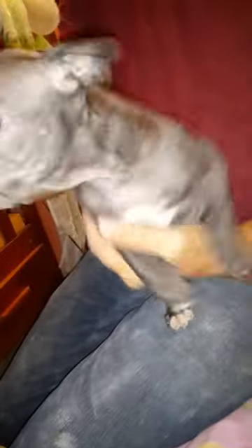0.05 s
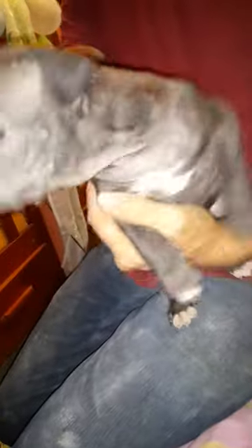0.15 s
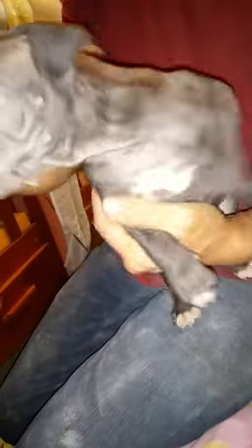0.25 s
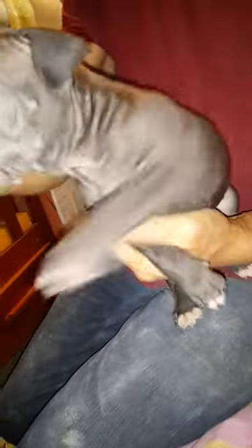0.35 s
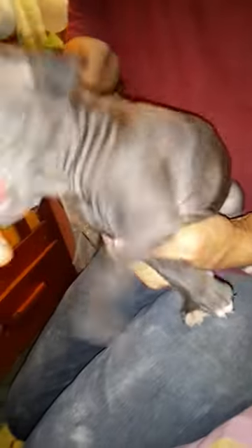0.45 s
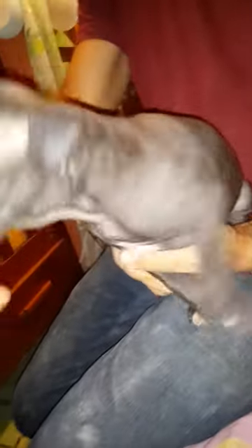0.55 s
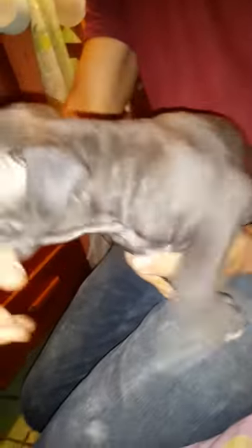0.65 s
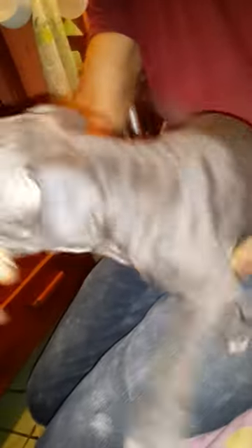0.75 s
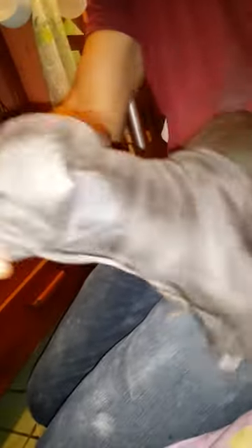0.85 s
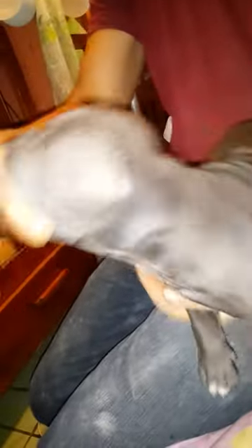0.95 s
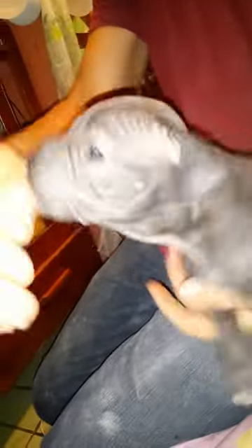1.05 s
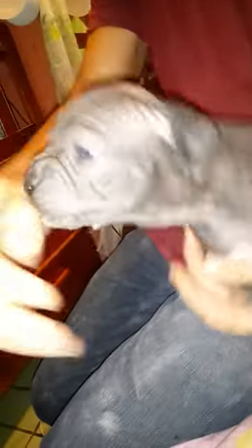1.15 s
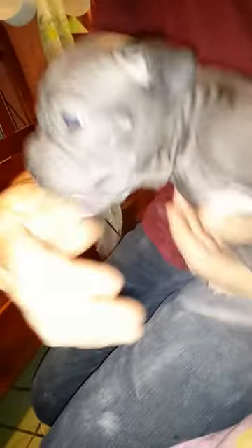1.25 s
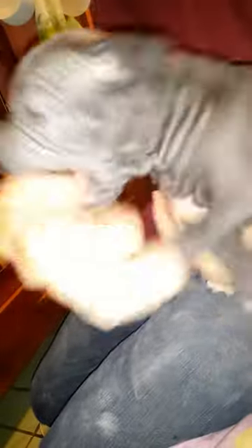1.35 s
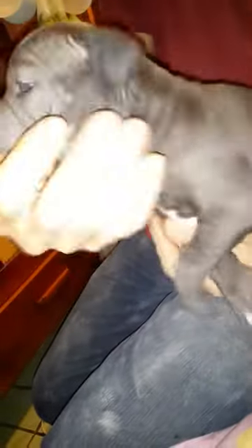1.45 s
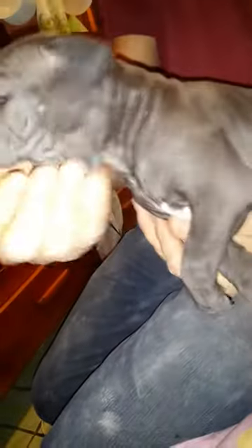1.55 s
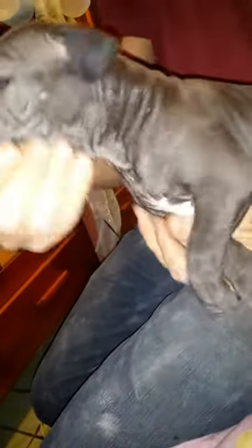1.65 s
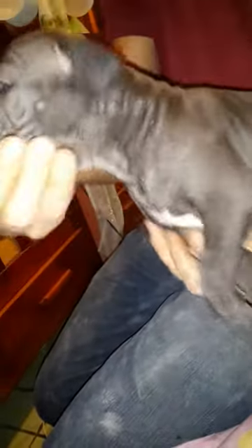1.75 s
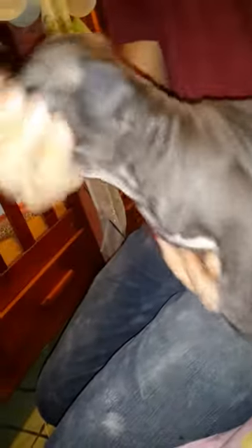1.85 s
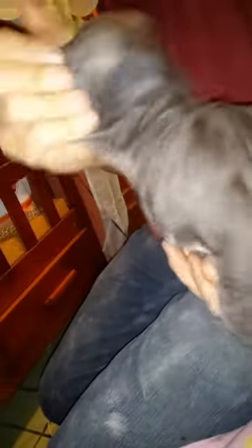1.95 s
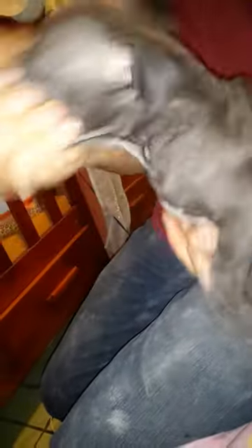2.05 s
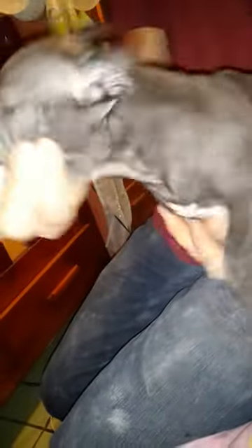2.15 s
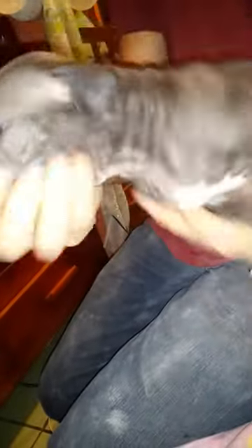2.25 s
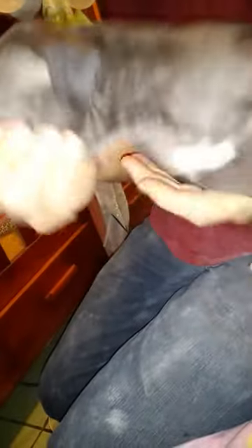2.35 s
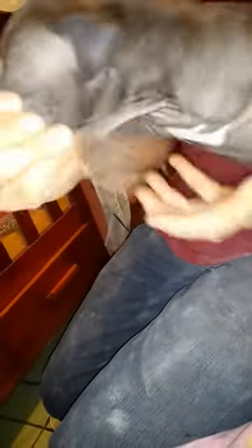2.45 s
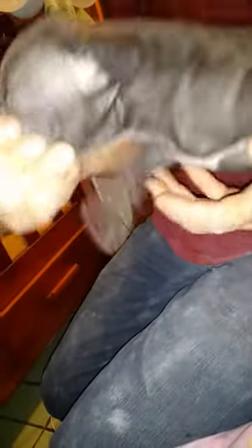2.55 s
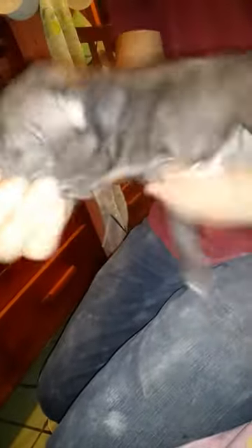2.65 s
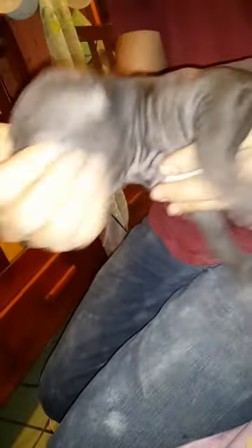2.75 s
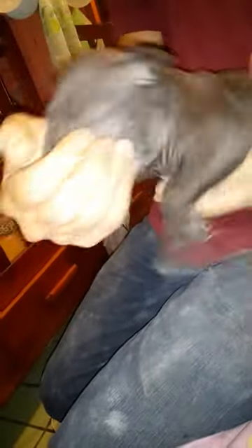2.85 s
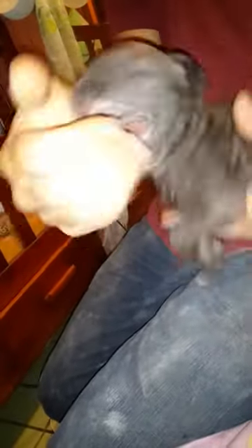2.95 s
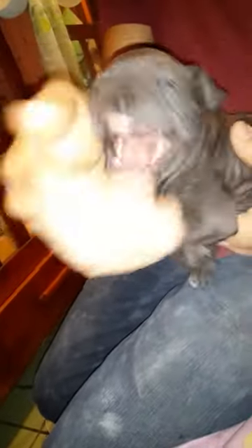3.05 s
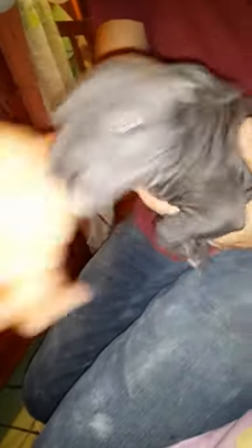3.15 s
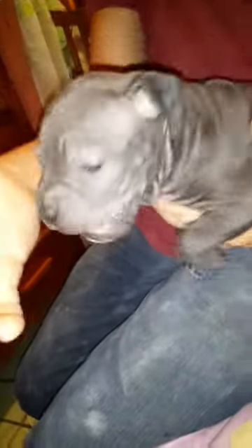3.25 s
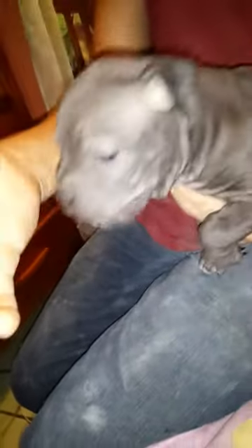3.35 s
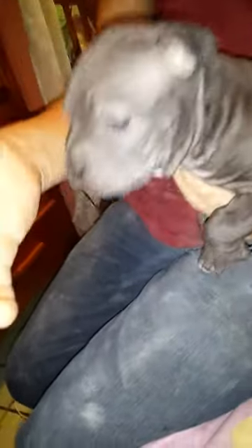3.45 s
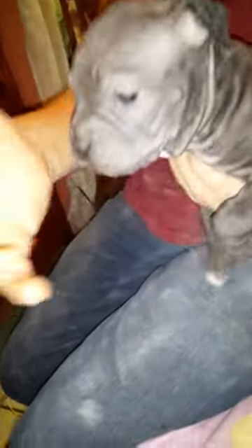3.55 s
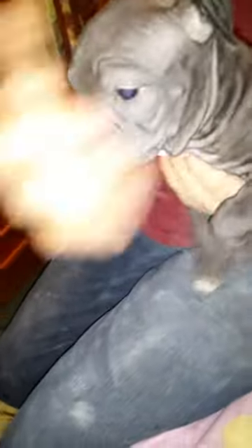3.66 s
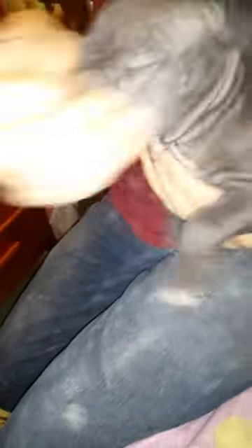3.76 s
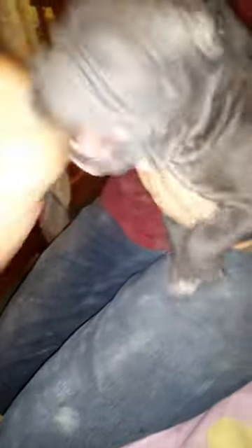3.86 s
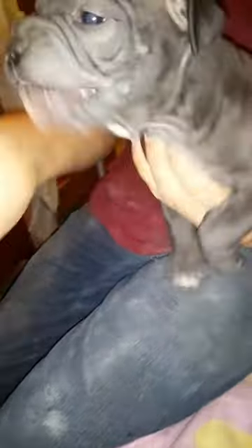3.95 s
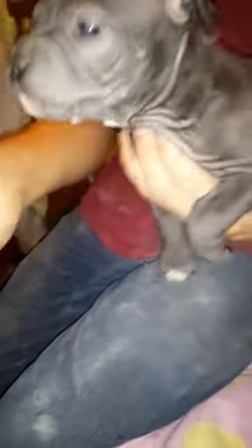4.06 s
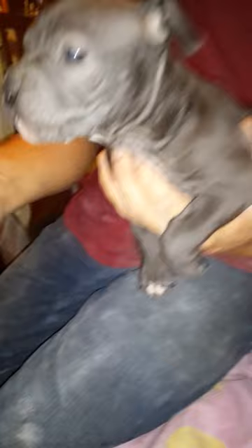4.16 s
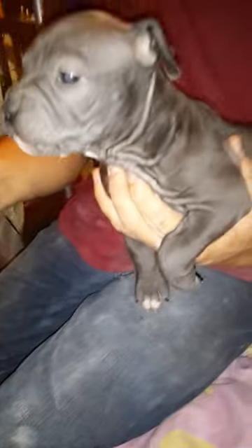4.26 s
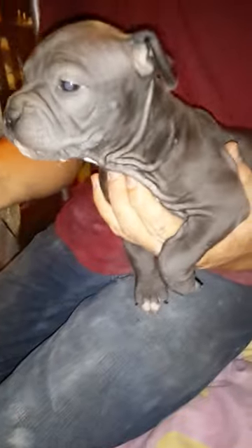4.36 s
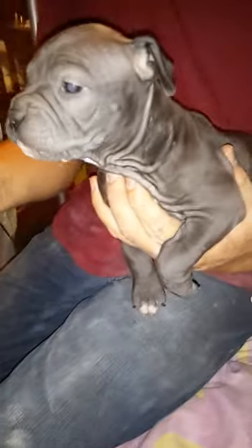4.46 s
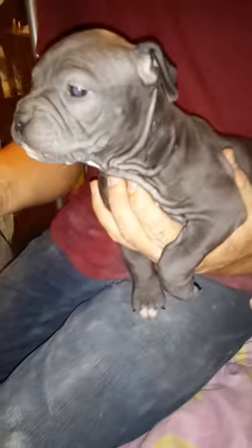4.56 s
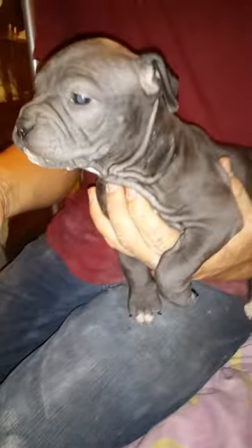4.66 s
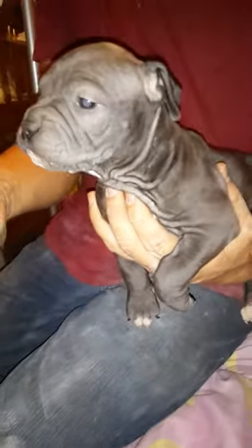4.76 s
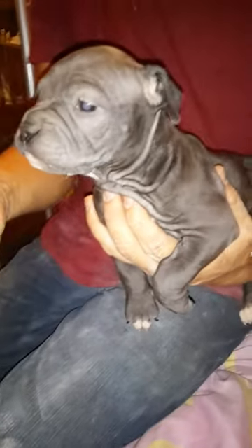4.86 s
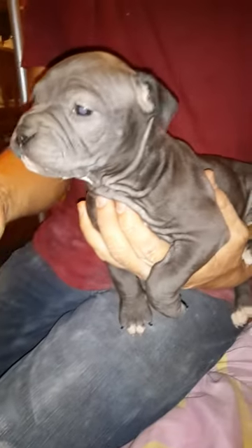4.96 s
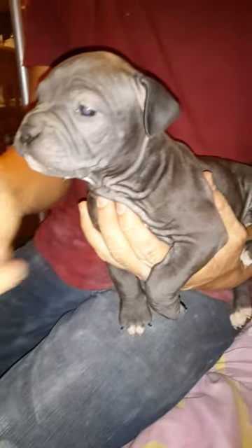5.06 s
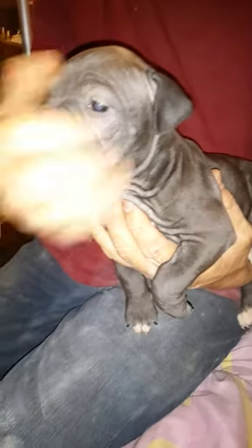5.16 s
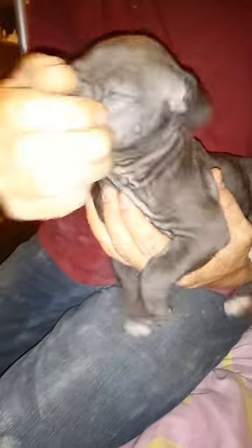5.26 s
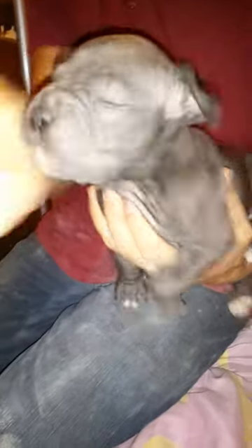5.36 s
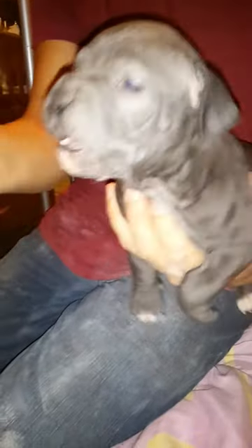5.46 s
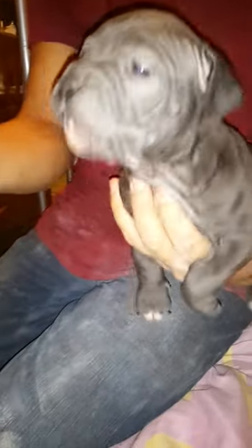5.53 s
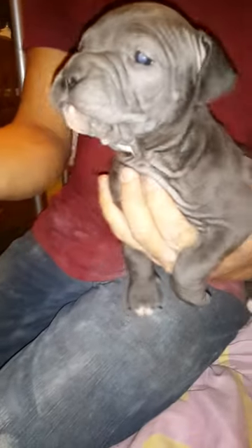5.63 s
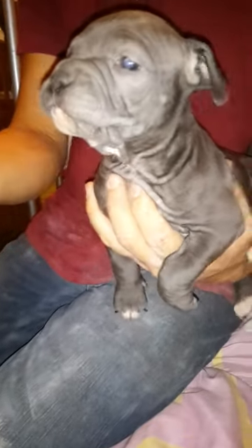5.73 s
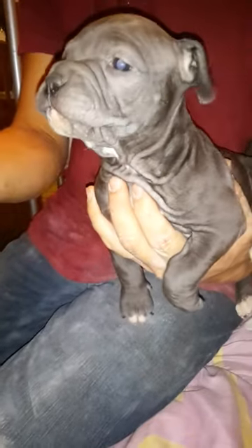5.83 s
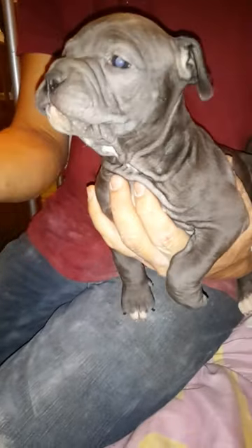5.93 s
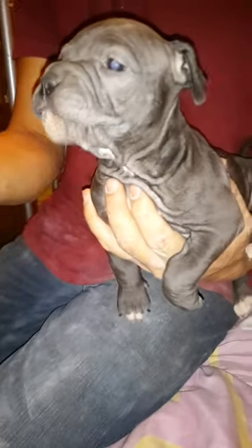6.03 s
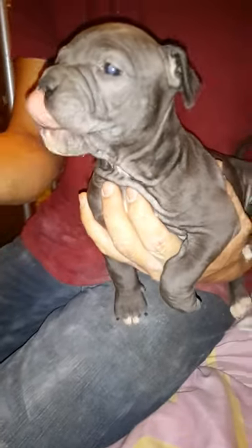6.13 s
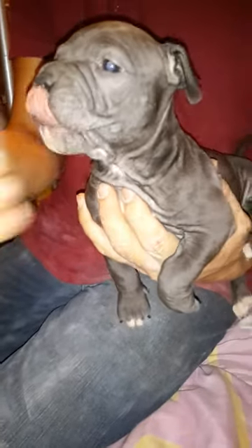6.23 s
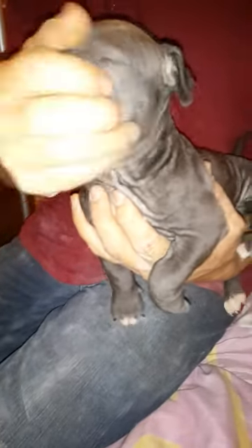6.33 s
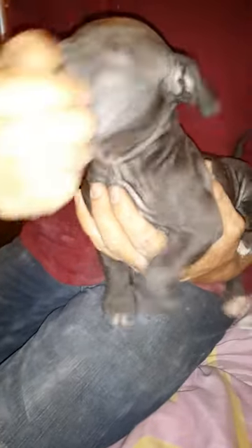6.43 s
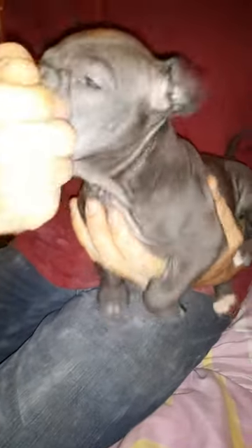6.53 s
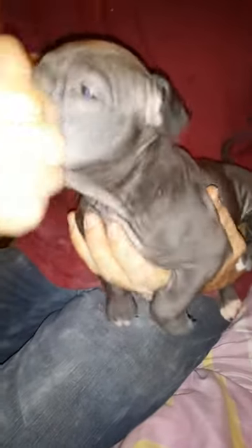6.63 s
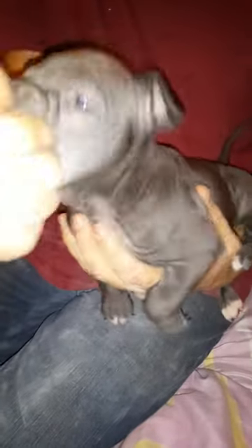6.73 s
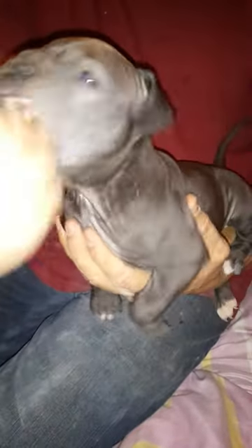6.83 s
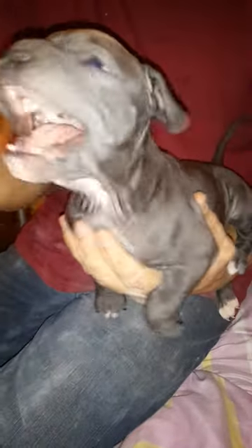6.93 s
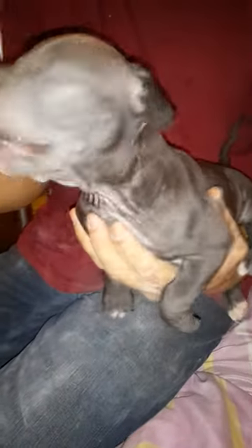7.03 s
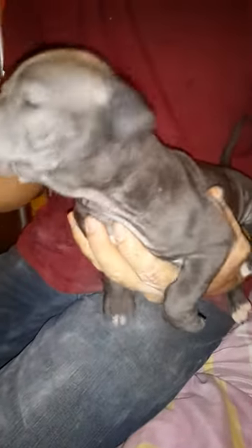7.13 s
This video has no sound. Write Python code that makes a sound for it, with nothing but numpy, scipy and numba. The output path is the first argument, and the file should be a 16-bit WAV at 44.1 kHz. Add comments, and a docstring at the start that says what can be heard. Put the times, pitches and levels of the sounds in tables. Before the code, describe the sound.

A young puppy growls close to the microphone in a small, dry furnished room, over low rumble and light hiss. From 0 to 0.45 s comes a rough, raspy growl, then a tiny grunt with wet clicks, a fur swish and soft bumps around 0.6-0.85. Growling resumes from 0.8 to 1.35, fading lower, and again from 1.7 to 2.3 with crackling throat snaps. The fiercest bout, 2.6-3.2, surges and snarls, followed by fur rubbing and wet mouth clicks. A quieter growl at 3.5-3.8 leads to a higher yap around 4.0-4.1, with a faint thin whine falling until 4.4. Near silence follows until about 5.2, when soft bumps and ticks return. A short, sharp yap lands at 5.6. Small wet clicks, a weak grunt at 6.25, a sniff at 6.35 and fur rubs from 6.5 to 6.85 precede a final rising, then coarse growl at 6.9-7.2.

```python
"""A young puppy on a lap growls in short bouts while a hand plays with its muzzle, in a small furnished room.
Uneven snaps of its vocal folds ring in chest, throat and mouth and chop the airflow into a rasp.
Twice the growl tightens into a yap; a faint pure whine falls after the first.
Around the bouts fur rubs in coloured noise, the wet mouth clicks as struck modes, and the puppy sniffs once.
Two close microphone ports pick it up, over soft bumps, low rumble and hiss."""
import sys
import numpy as np
from scipy import signal
from scipy.fft import rfft, irfft, next_fast_len
from scipy.io import wavfile
from scipy.ndimage import uniform_filter1d, map_coordinates
from numba import njit

SR = 44100
rng = np.random.default_rng(int(sys.argv[2]) if len(sys.argv) > 2 else 0)


def dump_mix(stems):
    """Bounce the given channels to the path in sys.argv[1] as a 16-bit WAV at rate SR."""
    frames = np.atleast_2d(stems).T  # one column per channel
    limited = np.clip(frames, -1, 1)  # hard clip at full scale
    pcm = np.round(limited * 32767).astype(np.int16)
    wavfile.write(sys.argv[1], SR, pcm)


N = 317079
TIME = np.arange(N) / SR


def from_db(db):
    """Decibels to amplitude gain."""
    return 10 ** (np.asarray(db) / 20)


def rms_one(x):
    """Scale to unit power."""
    return x / np.sqrt(np.mean(x ** 2) + 1e-20)


def even(x, span_s=0.028):
    """Hold the short-term power near one, over a span long enough to keep single pulses."""
    size = max(int(span_s * SR), 8)
    power = uniform_filter1d(uniform_filter1d(x * x, size), size // 2)
    return x / np.sqrt(power + 1e-14)


def in_time(rows):
    """Interpolate the columns after the first (seconds) at every sample."""
    s, *columns = np.transpose(rows)
    return [np.interp(TIME, s, column) for column in columns]


def drift(rate_hz):
    """Random curve of spread about one, with `rate_hz` new values a second."""
    values = rng.standard_normal(8000)
    return 1.2 * np.interp(TIME * rate_hz, np.arange(len(values)), values)


def swell(centre_s, half_s):
    """A smooth hump of height one."""
    return np.exp(-.5 * np.minimum(((TIME - centre_s) / half_s) ** 2, 30))


def envelope(start_s, end_s, attack_s, release_db_per_s):
    """Rise from the start, hold until the end, then die away."""
    rise = np.clip((TIME - start_s) / attack_s, 0, 1)
    return rise * from_db(-release_db_per_s * np.clip(TIME - end_s, 0, .5))


def colour(x, points):
    """Shape a signal by a spectrum of (Hz, dB) points."""
    hz, db = np.transpose(points)
    size = next_fast_len(N + 2048)
    grid_hz = np.maximum(np.fft.rfftfreq(size, 1 / SR), 1)
    gain = from_db(np.interp(np.log(grid_hz), np.log(hz), db))
    return irfft(rfft(x, size) * gain, size)[..., :N]


def noise(points):
    """Coloured noise of unit power."""
    return rms_one(colour(rng.standard_normal(N), points))


def cut(x, hz, kind, order=2):
    """Butterworth high- or low-pass."""
    sos = signal.butter(order, min(hz, SR / 2 - 500), kind, fs=SR, output="sos")
    return signal.sosfilt(sos, x + 1e-18)


def delayed(x, seconds):
    """Read a signal late by a changing time."""
    return map_coordinates(x, [np.arange(N) - seconds * SR], order=2, mode="nearest")


@njit
def resonate(x, hz, width_hz):
    """Two-pole resonance with moving centre and width, and gain one on top."""
    y = np.zeros(len(x))
    for i in range(2, len(x)):
        r = np.exp(-np.pi * width_hz[i] / SR)
        driven = (1 - r * r) / 2 * (x[i] - x[i - 2])
        y[i] = driven + 2 * r * np.cos(2 * np.pi * hz[i] / SR) * y[i - 1] - r * r * y[i - 2] + 1e-18
    return y


def cavities(source, modes, patchy_db, wander=0.066):
    """Resonances of alternating sign that each shift and swell as the lips are pushed about."""
    out = 0
    for k, (hz, width_hz, db) in enumerate(modes):
        gain = (-1) ** k * from_db(db + patchy_db * drift(25))
        out = out + gain * resonate(source, hz * np.exp(wander * drift(24)), width_hz * np.ones(N))
    return out


def strike(times_s, sizes, modes):
    """Clicks set damped modes ringing in proportion to each click's height."""
    clicks, out = np.full(N, 1e-18), 0
    clicks[(np.asarray(times_s) * SR).astype(int)] = sizes
    for hz, width_hz, db in modes:
        r, w = np.exp(-np.pi * width_hz / SR), 2 * np.pi * hz / SR
        out = out + from_db(db) * signal.lfilter([0, np.sin(w)], [1, -2 * r * np.cos(w), r * r], clicks)
    return out


# Background levels. Each row: time in seconds, relative rumble in dB, relative hiss in dB.
BACKGROUND_DB = [(0, -52.5, -49.5), (3.8, -69.5, -54), (4.1, -68, -66), (4.45, -78, -70.5),
                 (4.8, -77.5, -70), (5.05, -72, -64), (5.3, -60, -52.5), (5.9, -63.5, -57),
                 (7.19, -59.5, -55)]
# Rumble spectrum. Each row: frequency in Hz, relative level in dB.
RUMBLE_SPECTRUM = [(12, -31.5), (20, -3), (43, -21), (96, -7), (166, -0.5), (281, -10.5), (649, -17),
                   (1440, -21), (1570, -22.5), (3000, -25.5), (3900, -62.5), (6600, -120)]
# Hiss spectrum. Each row: frequency in Hz, relative level in dB.
HISS_SPECTRUM = [(1760, -56.5), (3000, -23), (4500, -18), (4950, -8), (5530, -8.5), (6340, -4), (8410, -2),
                 (9580, -20), (10400, -20.5), (14200, -24.5), (15500, -40)]


def background():
    """Low room rumble mostly shared by both ports, and independent hiss that is stronger on the left."""
    rumble_gain, hiss_gain = from_db(in_time(BACKGROUND_DB))
    rumble = noise(RUMBLE_SPECTRUM) + 0.17 * np.array([noise(RUMBLE_SPECTRUM), noise(RUMBLE_SPECTRUM)])
    hiss = np.array([noise(HISS_SPECTRUM), noise(HISS_SPECTRUM)]) * from_db([[5], [-5]])
    return rumble_gain * rumble + hiss_gain * hiss


# Soft bumps close to the ports. Each row: time in seconds, relative level in dB, left-right difference in dB.
BUMPS = [(0.578, -27.5, -3), (0.849, -17.5, 6), (1.993, -22, -17.5), (5.185, -25.5, -24.5),
         (5.508, -27.5, 0)]
# Modes the bumps excite. Each row: frequency in Hz, width in Hz, relative level in dB.
BUMP_MODES = [(174, 60, -14), (490, 380, 7), (1070, 210, 0.5)]


def bumps():
    """Dull knocks of damped modes, stronger at the nearer port."""
    s, db, pan_db = np.transpose(BUMPS)
    knocks = np.array([strike(s, from_db(db + side * pan_db / 2), BUMP_MODES) for side in (1, -1)])
    return cut(cut(knocks, 214, "high"), 2000, "low", order=1)


# Hand on fur. Each row: start in seconds, end in seconds, relative thudding in dB, relative swish in dB.
RUBS = [(0.642, 0.644, -42, -27), (1.457, 1.57, -61.5, -46.5), (1.667, 1.683, -43, -45.5),
        (2.344, 2.592, -62.5, -44.5), (2.454, 2.482, -61, -36), (3.182, 3.244, -45.5, -28),
        (3.28, 3.322, -49, -30.5), (5.462, 5.515, -45.5, -36.5), (5.81, 5.828, -49.5, -49),
        (6.533, 6.577, -53, -46), (6.594, 6.854, -57.5, -44), (6.753, 6.76, -65, -42)]
# Thudding spectrum. Each row: frequency in Hz, relative level in dB.
THUD_SPECTRUM = [(41, -36.5), (70, -14.5), (183, -3), (217, -2.5), (510, -11), (913, -14), (1200, -10),
                 (1560, -44), (2640, -120)]
# Swish spectrum. Each row: frequency in Hz, relative level in dB.
SWISH_SPECTRUM = [(530, -46.5), (900, -19), (1320, -4.5), (1560, -1), (2690, -14), (3500, -7), (5570, -9.5),
                  (6200, -9), (8860, 3.5), (11200, -10.5), (14100, -13), (15000, -28), (15500, -58)]
RUB_ATTACK_S, RUB_RELEASE_DB_PER_S = 0.0074, 331


def fur():
    """Friction noise of a hand on fur: soft thudding and a grainy swish."""
    thud_gain, swish_gain = sum(
        from_db([[thud_db], [swish_db]]) * envelope(start_s, end_s, RUB_ATTACK_S, RUB_RELEASE_DB_PER_S)
        for start_s, end_s, thud_db, swish_db in RUBS)
    swish = rms_one(noise(SWISH_SPECTRUM) * from_db(0.46 * drift(150)))
    return thud_gain * noise(THUD_SPECTRUM) + swish_gain * swish


# Wet clicks of lips and teeth. Each row: time in seconds, relative level in dB, extra level of the tick in dB.
SMACKS = [(0.5988, -14, -6), (.61, -12.5, -2), (3.239, -14.5, -2), (3.3248, -13.5, 0), (3.3568, -17, -3),
          (3.801, -26.5, -4), (5.3122, -34, 15), (5.5076, -40, -2), (5.826, -46, 27), (6.016, -53, 42),
          (6.0489, -52, 41.5), (6.255, -46.5, 20.5), (6.6141, -22.5, 27), (6.7646, -15, -11)]
# Mouth modes. Each row: frequency in Hz, width in Hz, relative level in dB.
TEETH_MODES = [(1700, 140, 15.5), (3180, 88, 6.5), (5000, 2910, -2)]
# Thin wet tick between the lips. Each row: frequency in Hz, width in Hz, relative level in dB.
TICK_MODES = [(9300, 870, -2.5), (12690, 3000, -15.5)]


def wet_mouth():
    """Clicks of lips and teeth ring damped modes of the mouth and tick between the lips."""
    s, db, tick_db = np.transpose(SMACKS)
    ring = strike(s, from_db(db - 22.0), TEETH_MODES)
    return ring + strike(s, from_db(db + tick_db - 17.5), TICK_MODES)


# A sniff through the nose. The row: start in seconds, end in seconds, relative level in dB.
SNIFF = (6.29, 6.378, -29)
# Nose spectrum. Each row: frequency in Hz, relative level in dB.
NOSE_SPECTRUM = [(240, -104), (400, -72), (503, -26), (623, -18), (987, -18.5), (1200, -29), (1470, -23),
                 (2800, -24), (3740, -22), (4630, -16.5), (6600, -15), (8400, 4.5), (10000, -7.5),
                 (14600, -15), (15500, -65)]
SNIFF_ATTACK_S, SNIFF_RELEASE_DB_PER_S = 0.065, 269.5


def sniff():
    """Turbulent air coloured by the nose, swelling up and soon dying away."""
    start_s, end_s, db = SNIFF
    shape = envelope(start_s, end_s, SNIFF_ATTACK_S, SNIFF_RELEASE_DB_PER_S)
    return from_db(db) * shape * noise(NOSE_SPECTRUM)


# Tiny whine after the first yap. Each row: time in seconds, pitch in Hz, relative level in dB.
WHINE = [(4.21, 1297, -77), (4.25, 1242, -67), (4.33, 1146, -58), (4.37, 1126, -84), (4.43, 1126, -92.5)]


def whine():
    """A faint falling sine with a slightly unsteady pitch."""
    pitch_hz, level_db = in_time(WHINE)
    sounding = (TIME > WHINE[0][0]) & (TIME < WHINE[-1][0])
    phase = 2 * np.pi * np.cumsum(pitch_hz * np.exp(0.00856 * drift(90))) / SR
    return sounding * from_db(level_db + 1.0) * np.sin(phase)


# Yaps, one list each. Each row: time in seconds, pitch in Hz, roughness 0-1.
YAPS = [
    [(3.995, 417, 0.24), (4.005, 440, 0.12), (4.02, 448.7, .06), (4.04, 429.2, 0.02), (4.06, 405.5, .11),
     (4.08, 379.7, 0.25), (4.125, 330, .8)],
    [(5.58, 256.5, .6), (5.598, 312.5, .3), (5.616, 338.6, .14), (5.631, 351.9, .08), (5.645, 317.3, 0.3),
     (5.657, 276.1, .75)],
]


def register(pitch_hz, rough):
    """In a yap the folds flip high, arch in pitch and fray again; purity (0-1) falls as they fray."""
    pure = np.zeros(N)
    for yap in YAPS:
        high = (TIME >= yap[0][0]) & (TIME < yap[-1][0])
        yap_hz, frayed = in_time(yap)
        frayed = np.clip(frayed, 0, 1)
        pitch_hz = np.where(high, yap_hz, pitch_hz)
        rough = np.where(high, frayed, rough)
        pure = np.where(high, 1 - frayed, pure)
    return pitch_hz, rough, pure


# Growls at usual effort and jaw. Each row: start in seconds, end in seconds, first pitch in Hz, last pitch
# in Hz, roughness 0-1, snarl resonance in Hz, then relative chest, cheek, snarl and rasp levels in dB.
GROWLS = [ (0.0, 0.447, 138.2, 138.2, 0.81, 3050, -34.5, -43.5, -36, -37.5),
          (0.565, 0.605, 149.8, 149, 0.87, 3700, -34.5, -40, -27.5, -23.5),
          (0.807, 0.908, 129.8, 130.7, 0.95, 4350, -33, -41, -38, -35),
          (0.922, 1.181, 138.3, 141.1, 0.48, 4400, -33.5, -42, -38, -33),
          (1.189, 1.355, 160, 130.1, 0.48, 4300, -33, -40, -32.5, -32.5),
          (1.703, 2.15, 121.8, 128.6, 0.83, 4370, -36.5, -38.5, -40, -34.5),
          (2.163, 2.317, 111.8, 135.4, 0.79, 4300, -36.5, -40, -38, -33.5),
          (2.606, 2.959, 144.9, 134.9, 0.68, 3800, -33, -37, -35.5, -32.5),
          (2.971, 3.174, 135, 149.9, .7, 4130, -33, -34.5, -35.5, -31.5),
          (3.47, 3.585, 137.9, 140.8, 0.56, 4380, -34.5, -40.5, -40.5, -34.5),
          (3.597, 3.827, 151.7, 129.8, 0.29, 4900, -39, -42, -41.5, -36.5),
          (3.872, 3.921, 155.6, 171.3, 0.2, 4600, -40.5, -30, -44.5, -32.5),
          (3.927, 4.098, 128.1, 164.9, .35, 4660, -38, -49.5, -38, -35),
          (5.552, 5.667, 197.8, 185.5, 0.69, 3239, -36, -47, -33.5, -33),
          (6.233, 6.28, 215.2, 214.8, .4, 3741, -42, -39, -41.5, -38),
          (6.897, 6.997, 170.1, 234.6, .5, 3600, -36.5, -35.5, -33.5, -39),
          (7.003, 7.191, 135.8, 139.2, 0.81, 4550, -33.5, -34.5, -30, -32), ]
# Effort and jaw, one list per bout. Each row: time in seconds, effort (relative throat level) in dB,
# jaw opening (main throat resonance) in Hz.
BOUTS = [
    [(0, -27, 1460), (.04, -26, 1022), (.105, -25, 2013), (.16, -19, 1300), (.2, -18, 1150),
     (.28, -19.5, 1207), (.39, -29, 1144), (.445, -24, 1200)],
    [(.57, -34, 1740), (.64, -38, 1590)],
    [(.815, -28.5, 1170), (.862, -24, 1285), (.92, -35, 1249), (1.015, -26, 1156), (1.14, -22, 1553),
     (1.185, -33, 1047), (1.222, -38, 620.5), (1.25, -32, 890), (1.29, -38, 760), (1.325, -41, 670),
     (1.35, -30, 1080)],
    [(1.712, -22, 1252), (1.81, -30, 1230), (1.865, -24, 1300), (1.92, -26, 1280), (1.965, -19.5, 1437),
     (2.05, -33, 1249), (2.1, -37, 1098), (2.155, -29.5, 1050), (2.175, -18, 1133), (2.25, -19, 1124),
     (2.31, -15, 1341)],
    [(2.615, -36, 592), (2.66, -27, 700), (2.678, -29.5, 822.4), (2.696, -20, 994), (2.73, -24, 1062),
     (2.748, -15, 1038), (2.768, -21, 1047), (2.83, -14.5, 1250), (2.855, -21, 1215), (2.872, -17, 1136),
     (2.9, -29.5, 1050), (2.935, -33, 630), (2.96, -33, 880)],
    [(2.985, -21, 1014), (3.005, -27, 1050), (3.026, -19, 1014), (3.055, -26.5, 1030), (3.075, -21, 1375),
     (3.18, -27, 1420)],
    [(3.475, -35.5, 1550), (3.495, -18.5, 1519), (3.508, -32.5, 1451), (3.535, -28, 1206),
     (3.57, -39.5, 1065), (3.61, -43, 672.6), (3.7, -45, 653), (3.82, -49, 591.8)],
    [(3.875, -51, 1250), (3.922, -44, 1322), (3.933, -16, 1312), (3.96, -18.5, 1422), (3.99, -20, 1440),
     (4.02, -20.5, 1600), (4.05, -20.5, 1540), (4.085, -23.5, 1545), (4.11, -33.5, 1623)],
    [(5.55, -38.5, 1221), (5.562, -19.5, 1227), (5.574, -30, 1217), (5.596, -11.5, 1190),
     (5.618, -18, 1208), (5.648, -15, 1220), (5.657, -28.5, 1197), (5.675, -24.5, 1196)],
    [(6.24, -42, 664), (6.3, -44, 688)],
    [(6.906, -30, 543.5), (6.922, -34.5, 640), (6.944, -21, 1028), (6.959, -24, 1156), (6.98, -15.5, 1374),
     (7.005, -24, 1362), (7.08, -24.5, 1687), (7.135, -25, 1383), (7.155, -20, 1402), (7.19, -25.5, 1350)],
]
# How chest, cheek, snarl and rasp follow, in that order. Each row: dB per dB of effort,
# dB per octave of jaw, extra dB in a clean yap.
FOLLOWING = [(0.23, -4, -10), (1.03, -4, 16.5), (0.8349, 1.5, 4.5), (0.46, 2, -4)]
# Huffs through the wide-open mouth. Each row: centre in seconds, half length in seconds, extra level in dB.
HUFFS = [(0.073, 0.038, 7), (0.239, 0.018, 5), (0.614, 0.018, 7), (1.143, 0.019, 4), (1.964, 0.012, 0.5),
         (2.3, .025, 1), (2.925, 0.036, 6), (3.151, 0.039, 10.5), (4.03, .025, 3.5), (7.066, 0.0097, 4.5)]
GROWL_ATTACK_S, GROWL_RELEASE_DB_PER_S = 0.0039, 380
USUAL_EFFORT_DB, USUAL_JAW_HZ = -25, 1200
PITCH_OCTAVES_PER_DB, SNARL_OCTAVES_PER_JAW_OCTAVE = .014, 0.17
LIPS_CLOSED_DB, LIPS_DRAW_BACK_S = -4, 0.17


def controls():
    """Effort and jaw set pitch, resonances and layer gains; lips muffle the start, huffs lift the upper layers."""
    rows = np.array(GROWLS)
    current = np.maximum(np.searchsorted(rows[:, 0], TIME, "right") - 1, 0)
    start_s, end_s, first_hz, last_hz, rough, snarl_hz, *levels_db = rows[current].T
    glide_hz = first_hz + (last_hz - first_hz) * np.clip((TIME - start_s) / (end_s - start_s), 0, 1)
    effort_db, jaw_hz = in_time(sorted(point for bout in BOUTS for point in bout))
    harder_db = effort_db - USUAL_EFFORT_DB
    opening_octaves = np.log2(jaw_hz / USUAL_JAW_HZ)
    pushed_hz = glide_hz * 2 ** (PITCH_OCTAVES_PER_DB * harder_db)
    pitch_hz, rough, pure = register(pushed_hz, np.clip(rough, 0, 1))
    sounding = np.max([envelope(*span, GROWL_ATTACK_S, GROWL_RELEASE_DB_PER_S) for span in rows[:, :2]], axis=0)
    age_s = np.maximum(TIME - start_s, 0)
    bared_db = LIPS_CLOSED_DB * np.exp(-age_s / LIPS_DRAW_BACK_S)
    bared_db = bared_db + sum(db * swell(s, half_s) for s, half_s, db in HUFFS)
    chest_db, *upper_db = [
        db + by_effort * harder_db + by_jaw * opening_octaves + yap_db * pure
        for db, (by_effort, by_jaw, yap_db) in zip(levels_db, FOLLOWING)]
    layer_gains = sounding * from_db([effort_db, chest_db] + [db + bared_db for db in upper_db])
    snarl_hz = snarl_hz * 2 ** (SNARL_OCTAVES_PER_JAW_OCTAVE * opening_octaves)
    return pitch_hz, rough, pure, jaw_hz, snarl_hz, layer_gains


def vocal_folds(pitch_hz, rough):
    """Closures of the folds, each early or late and strong or weak, and the puff of air after each."""
    wobble, jitter_cycles, shimmer_db = .15, .14, 4.6  # at full roughness, per unit of random spread
    cycles = np.cumsum(pitch_hz * np.exp(wobble * rough * drift(70))) / SR
    beat = np.interp(np.arange(1, int(cycles[-1])), cycles, np.arange(N))
    at = beat.astype(int)
    early, strength = np.clip(rng.standard_normal((4000, 2))[:len(at)].T, -2, 2)
    closure = np.clip(beat + jitter_cycles * rough[at] * early * SR / pitch_hz[at], 0, N - 2)
    size = from_db(shimmer_db * rough[at] * strength)
    # each pulse is shared between two samples
    whole, part = closure.astype(int), closure % 1
    snaps = np.bincount(whole, size * (1 - part), N) + np.bincount(whole + 1, size * part, N)
    puff_s = 0.0038
    puffs = signal.lfilter([1], [1, -np.exp(-1 / (puff_s * SR))], snaps + 1e-18)
    return snaps, puffs


# Hard snaps of the folds, in a growl or alone. Each row: time in seconds, relative level in dB.
SNAPS = [(0.285, -15), (0.847, -10.5), (0.868, -14.5), (1.011, -10.5), (1.342, -17), (1.364, -30.5),
         (1.713, -27), (2.092, -14.5), (2.112, -20), (2.129, -16.5), (2.151, -13.5), (2.171, -10.5),
         (2.243, -11.5), (2.308, -6.5), (2.641, -16), (3.497, -8.5), (3.601, -20.5), (3.934, -14),
         (3.964, -7), (5.561, -14), (6.938, -11)]
# Resonances besides the jaw's. Each row: frequency in Hz, width in Hz, relative level in dB.
SNAP_OVERTONES = [(1810, 520, -6.5), (3330, 290, -13), (4456, 550, -21)]
SNAP_WIDTH_HZ = 201


def hard_snaps(jaw_hz):
    """Lone closures of the folds ring in the throat."""
    s, db = np.transpose(SNAPS)
    clicks = np.bincount((s * SR).astype(int), from_db(db) * SR / (2 * np.pi * SNAP_WIDTH_HZ), N)
    ring = cavities(clicks, [(jaw_hz, SNAP_WIDTH_HZ, 0)] + SNAP_OVERTONES, patchy_db=2.5)
    return cut(ring, 450, "high")


LURCH_DB, LURCHES_PER_S = 2, 55  # spread at full roughness, before layer scaling
STALL_DB, STALL_LEAD_S, STALL_HALF_S = -6, .006, 0.0023  # level before layer scaling


def pushes(rough):
    """Rough growls lurch at random; the folds stay shut while pressure builds for a hard snap (dB)."""
    stall = sum(swell(s - STALL_LEAD_S, STALL_HALF_S) for s, _ in SNAPS)
    return LURCH_DB * rough * drift(LURCHES_PER_S) + STALL_DB * stall


# Voice forced through the nose. Each row: centre in seconds, half length in seconds, resonance in Hz,
# relative level in dB.
TWANGS = [(2.665, 0.0095, 1708, -16.5), (2.714, 0.0059, 1780, -24.5), (2.844, 0.018, 1580, -27),
          (3.689, 0.13, 1501, -46), (6.942, 0.011, 1686, -16.5), (6.988, .012, 1658, -20.5),
          (7.084, 0.054, 1840, -28)]
TWANG_WIDTH_HZ = 90


def twang(source):
    """The voice briefly rings in a nose resonance that ignores the jaw."""
    hz, = in_time([(s, hz) for s, _, hz, _ in TWANGS])
    width_hz = TWANG_WIDTH_HZ * np.ones(N)
    gain = sum(from_db(db) * swell(s, half_s) for s, half_s, _, db in TWANGS)
    return gain * even(resonate(resonate(source, hz, width_hz), hz, 3 * width_hz))


# Chest and nose pass the lowest harmonics. Each row: frequency in Hz, width in Hz, relative level in dB.
CHEST_MODES = [(148, 77, -4.5), (256, 75, 1), (530, 200, -5)]
# Narrow gaps between lips and teeth. Each row: frequency in Hz, width in Hz, relative level in dB.
LIP_MODES = [(7260, 1300, 3.5), (8910, 1200, 8), (11500, 1500, -0.5), (14320, 1600, -5.5)]
YAP_LOWERS_CHEEK_HZ = 300
YAP_WIDENS_THROAT = 0.37  # the gaping mouth damps the throat: added share of width


def puppy():
    """Fold pulses and chopped airflow through chest, throat, nose, cheeks and lips."""
    pitch_hz, rough, pure, jaw_hz, snarl_hz, layer_gains = controls()
    throat_gain, chest_gain, cheek_gain, snarl_gain, rasp_gain = layer_gains
    snaps, puffs = vocal_folds(pitch_hz, rough)
    voice, air = even(snaps), even(puffs * rng.standard_normal(N))
    push_db = pushes(rough)

    # turbulence grows with roughness and weighs more higher up
    low = voice + (.03 + .5 * rough ** 2) * air
    middle = voice + (.25 + 1.2 * rough) * air
    high = voice + (.3 + 1.8 * rough) * air

    chest = cavities(low, CHEST_MODES, patchy_db=3.5)
    chest = even(cut(cut(chest, 120, "high", order=4), 720, "low", order=4))

    # both throat resonances ride on the jaw; the upper one is weaker and moves less
    widening = 1 + YAP_WIDENS_THROAT * pure
    throat_modes = [(jaw_hz, 170 * widening, 0), (1300 + .33 * jaw_hz, 240 * widening, -12.5)]
    throat = cavities(low, throat_modes, patchy_db=2.5, wander=.035)
    # the mouth cavity around them steepens the flanks
    throat = even(resonate(cut(throat, 520, "high"), jaw_hz, 900 * widening))

    cheek_hz = 1300 + 0.75 * jaw_hz - YAP_LOWERS_CHEEK_HZ * pure
    cheek = cavities(middle, [(cheek_hz, 300, 0)], patchy_db=4.5)
    cheek = even(cut(cut(cheek, 1500, "high"), 3000, "low"))

    snarl_modes = [(snarl_hz, 450, 0), (3250, 600, -9), (1300 + 0.89 * snarl_hz, 700, -6)]
    snarl = even(cut(cavities(high, snarl_modes, patchy_db=4.5, wander=.04), 2700, "high"))

    rasp = cavities(0.14 * voice + air, LIP_MODES, patchy_db=5.5)
    rasp = even(cut(rasp, 5800, "high"))

    mouth = from_db(2) * throat_gain * throat + from_db(6.0) * cheek_gain * cheek
    mouth = mouth + from_db(4.0) * snarl_gain * snarl + twang(low)
    chest_and_rasp = from_db(-1.0) * chest_gain * chest + from_db(1.5) * rasp_gain * rasp
    growl = chest_and_rasp * from_db(1.4 * push_db) + mouth * from_db(push_db - 1.5)
    return growl + hard_snaps(jaw_hz)


ROOM_T60_S = 0.24


def room(x, tail_db):
    """A short dull noise tail, different at each port."""
    t = TIME[:SR // 2]
    tail = cut(rng.standard_normal((2, len(t))), 4900, "low", order=1)
    tail = tail * from_db(-60 * t / ROOM_T60_S) * (t > .006)
    response = rms_one(tail) / np.sqrt(len(t))
    return from_db(tail_db) * signal.fftconvolve(x[None], response, axes=1)[:, :N]


# Nearby hand, arm, lap and chair. Each row: mean echo delay in seconds, relative level in dB.
SURFACES = [(.0006, -10), (.0013, -9.5), (.0027, -6), (.0048, -10)]
MEAN_PORT_LAG_S = .000168


def ports(x):
    """Sound reaches the left port first; echoes off nearby surfaces shift as head and hand move."""
    heard = np.array([x, delayed(x, MEAN_PORT_LAG_S * (1 + .15 * drift(4)))])
    bright = cut(x, 1100, "high", order=1)  # small surfaces reflect little bass
    for delay_s, db in SURFACES:
        path_s = delay_s * np.exp(0.1525 * drift(4))
        right_path_s = path_s + .00008 + 0.00014 * drift(3)
        heard = heard + from_db(db) * np.array([delayed(bright, path_s), delayed(bright, right_path_s)])
    return heard


# The head swings between the ports. Each row: time in seconds, left-right difference in dB.
HEAD_PAN = [(0, -2), (.6, -1.5), (1.2, -2), (1.8, -0.5), (2.3, 0.5), (3.2, -3), (3.6, -2), (4.05, -3),
            (5.6, -1.5), (6.3, -0.5), (6.75, -2), (7.1, -0.5)]
# Left port against right. Each row: frequency in Hz, relative level in dB.
LEFT_PORT_SPECTRUM = [(100, 0), (300, -3.5), (800, 0), (1400, -1), (3500, 1), (5000, -3), (6200, 2.5),
                      (7300, 1.5), (9000, -8), (14000, -17.5)]


def scene():
    """Puppy and hand close to the ports, in the room."""
    near = puppy() + whine() + fur() + sniff() + wet_mouth()
    pan_db, = in_time(HEAD_PAN)
    left, right = ports(near) * from_db([pan_db / 2, -pan_db / 2]) + room(near, tail_db=-11.5)
    near_ports = np.array([colour(left, LEFT_PORT_SPECTRUM), right]) * from_db(0.91)
    return near_ports + bumps() + background()


CUTOFF_HZ = 14900


def record(dry):
    """Round off the highest peaks, then cut the top steeply."""
    rounded = dry / (1 + dry ** 4) ** .25
    return signal.sosfilt(signal.ellip(10, .2, 80, CUTOFF_HZ, fs=SR, output="sos"), rounded)


dry = scene()
out = record(dry)
dump_mix(out)
```